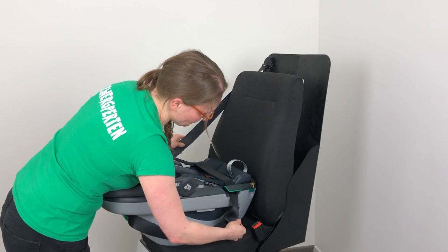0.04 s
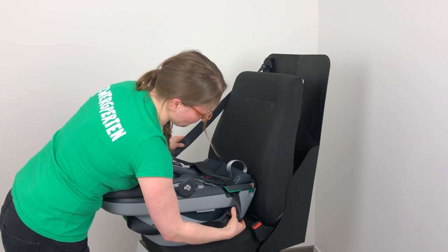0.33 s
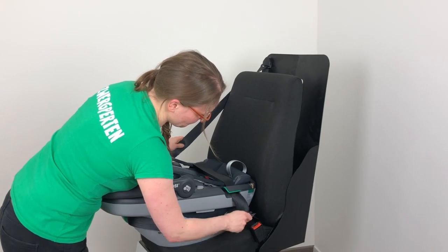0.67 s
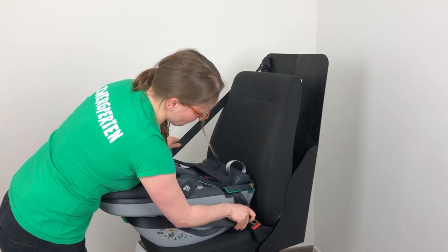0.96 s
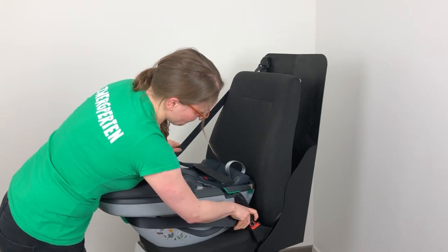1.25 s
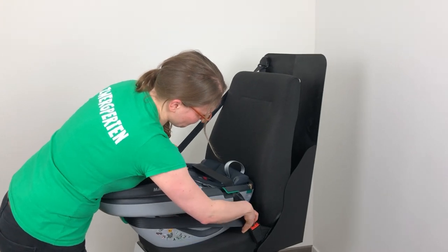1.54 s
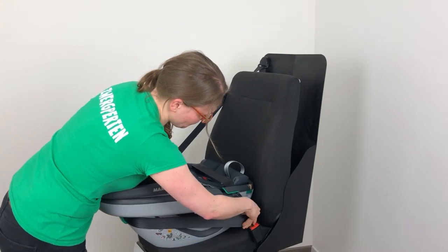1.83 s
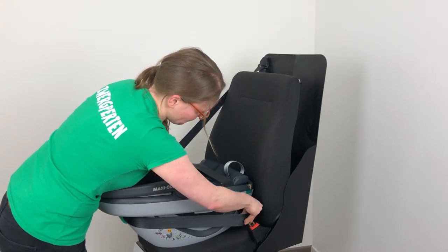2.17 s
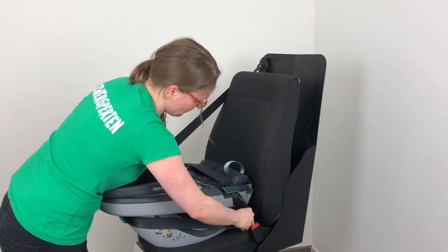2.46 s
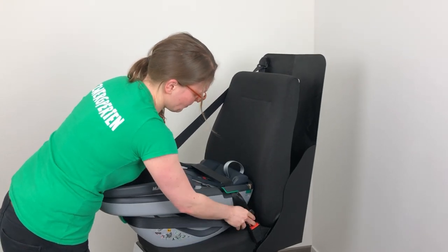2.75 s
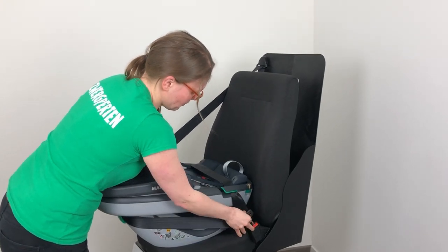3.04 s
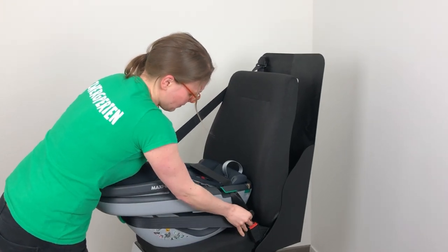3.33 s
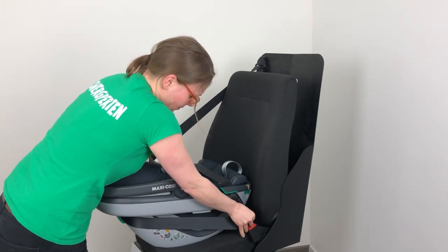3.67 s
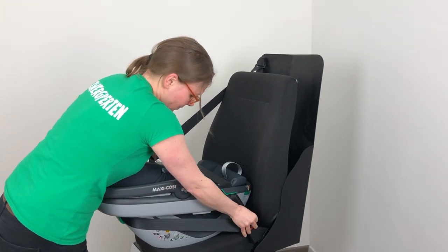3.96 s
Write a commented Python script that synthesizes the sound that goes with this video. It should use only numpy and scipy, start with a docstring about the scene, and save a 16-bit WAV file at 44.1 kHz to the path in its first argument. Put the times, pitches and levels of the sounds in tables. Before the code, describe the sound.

A seat belt buckle is handled and finally clicks home, sharp and loud. Before that come a child seat's hollow knock, a ringing clamp snap, light metal taps, low thuds and faint fabric rustle in a small bare room.

```python
"""A child seat is strapped onto a car seat in a small bare room, over a faint room tone.
First the plastic shell drops with a hollow knock, and webbing swishes as clothes rustle.
A second in, a belt clamp snaps and rings. Then the metal tongue taps and skids around the buckle
while the seat frame thuds softly under each push. Just before the end the latch springs home,
loud enough to overload the microphone."""
import sys
import numpy as np
from scipy import signal
from scipy.fft import rfft, irfft
from scipy.io import wavfile

SR = 44100
rng = np.random.default_rng(int(sys.argv[2]) if len(sys.argv) > 2 else 0)


def output_pcm(signal):
    """Save a mono or channel-first signal as 16-bit PCM at the path in sys.argv[1].

    Samples are clipped to [-1, 1] before scaling.
    """
    pcm = np.clip(np.atleast_2d(signal).T, -1, 1) * 32767
    wavfile.write(sys.argv[1], SR, np.round(pcm).astype(np.int16))


N = 176400
T = np.arange(N) / SR


def from_db(db):
    """Decibels to gain."""
    return 10 ** (np.asarray(db) / 20)


def rms_one(x):
    """Scale to rms 1."""
    return x / np.sqrt(np.mean(x ** 2) + 1e-20)


def unit_energy(x):
    """Scale to energy 1."""
    return x / np.sqrt(np.sum(x ** 2) + 1e-20)


def at_hz(curve, hz):
    """Read a curve along log frequency."""
    freqs, values = np.transpose(curve)
    return np.interp(np.log(np.maximum(hz, 1)), np.log(freqs), values)


def noise(colour):
    """Noise shaped by an EQ curve, rms 1."""
    hz = np.arange(N // 2 + 1) * SR / N
    white = rfft(rng.standard_normal(N))
    return rms_one(irfft(white * from_db(at_hz(colour, hz)) * (hz > 20), N))


def flicker(rate_hz, depth_db):
    """A randomly wavering gain."""
    return from_db(depth_db * np.interp(T * rate_hz, np.arange(4000), rng.standard_normal(4000)))


def contact(colour, size=2048):
    """One sharp click shaped by an EQ curve, energy 1."""
    hz = np.arange(size // 2 + 1) * SR / size
    cepstrum = irfft(np.log(from_db(at_hz(colour, hz))))
    cepstrum[1:size // 2] *= 2  # minimum phase packs the energy into the attack
    cepstrum[size // 2 + 1:] = 0
    return unit_energy(irfft(np.exp(rfft(cepstrum))))


def mode(hz, t60):
    """One second of a dying sine, energy 1."""
    return unit_energy(np.sin(2 * np.pi * hz * T[:SR]) * from_db(-60 * T[:SR] / t60))


def strike(cues, modes, colour, click_db, ring_db):
    """Each hit gives a contact click and sets the modes ringing in alternating polarity."""
    ring = sum(from_db(db) * (-1) ** k * mode(hz, t60) for k, (hz, db, t60) in enumerate(modes))
    hit = from_db(ring_db) * ring
    click = from_db(click_db) * contact(colour)
    hit[:len(click)] += click
    out = np.zeros(N + SR)
    for time, db in cues:
        start = int(time * SR)
        out[start:start + SR] += from_db(db) * hit
    return out[:N]


# EQ of the room tone: (frequency [Hz], gain [dB])
ROOM_TONE_EQ = [(22, -27), (35, 7), (58, 15), (75, 8), (110, -2), (280, -9), (600, -1), (1000, -9),
                (3000, -15.5), (9000, -17), (14800, -23), (16000, -19)]


def room_tone():
    """A faint, steady bed of bass-heavy noise."""
    return from_db(-50.5) * noise(ROOM_TONE_EQ)


# reverb time of the bare room: (frequency [Hz], t60 [s])
REVERB_TIMES = [(100, 1), (400, 0.54), (1000, 0.33), (2800, 0.34), (7000, 0.35), (15000, 0.21)]


def room_response(direct_db=18, early_db=5.5, early_decay_s=0.0062):
    """Direct sound, a burst of near reflections and a tail that dies band by band."""
    t, response = T[:SR], 0
    edges = np.geomspace(50, 18000, 64)
    white = rfft(rng.standard_normal(SR))
    hz = np.arange(len(white))
    early_lift = 1 + from_db(early_db) * np.exp(-t / early_decay_s)
    for low, high in zip(edges, edges[1:]):
        decay = from_db(-60 * t / at_hz(REVERB_TIMES, np.sqrt(low * high))) * early_lift
        band = irfft(white * ((hz >= low) & (hz < high)), SR) * decay
        energy = np.sum(decay ** 2) * 2 * (high - low) / SR
        response = response + unit_energy(band) * np.sqrt(energy)
    response[0] += from_db(direct_db)
    return response


# fader rides of the sleeves and of the shell on the upholstery: (time [s], relative level [dB])
SLEEVE_FADER = [(0.0, -50), (0.22, -49.5), (0.35, -54), (1.14, -51.5), (1.28, -50.5), (1.49, -47),
                (1.66, -51.5), (1.8, -55.5), (2.06, -57), (2.42, -49.5), (2.63, -53), (2.84, -53),
                (3.48, -46.5), (3.85, -50)]
UPHOLSTERY_FADER = [(0, -46), (.35, -59), (.48, -49.5), (.8, -45), (1.05, -50.5), (1.3, -37.5), (1.55, -46),
                    (1.75, -50), (1.98, -51.5), (2.05, -44), (2.24, -48.5), (2.44, -46), (2.55, -51),
                    (2.9, -51), (3.04, -47), (3.38, -51), (3.46, -40.5), (3.56, -48), (4, -40.5)]
# EQ of the bright rustle and of the low rub: (frequency [Hz], gain [dB])
SLEEVE_EQ = [(300, -16.5), (1000, 2.5), (3000, 5), (7000, -0.5), (12000, -5.5), (16000, -11)]
UPHOLSTERY_EQ = [(30, -32), (60, -22), (120, -4), (280, -1.5), (420, -6.5), (700, -11.5), (1500, -19),
                 (4000, -41)]


def cloth():
    """Sleeves rustle and the shell rubs on the upholstery."""
    grain, sway = flicker(120, depth_db=1.5), flicker(60, depth_db=.8)
    rustle = from_db(np.interp(T, *np.transpose(SLEEVE_FADER))) * noise(SLEEVE_EQ)
    rub = from_db(np.interp(T, *np.transpose(UPHOLSTERY_FADER)) + 3.5) * noise(UPHOLSTERY_EQ)
    return rustle * grain + rub * sway


# belt swishes: (peak time [s], half length [s], relative level [dB], band centre [Hz])
SWISHES = [(0.101, 0.022, -53, 9000), (0.37, 0.044, -53.5, 5940), (0.592, 0.027, -45, 2100),
           (0.678, 0.032, -45, 2420), (0.687, 0.025, -47, 7000), (0.799, 0.024, -46, 2340),
           (0.901, 0.031, -48, 1390), (2.072, 0.036, -46.5, 930), (2.338, 0.014, -46, 880),
           (2.864, .025, -52, 2040), (3.043, 0.054, -49, 890), (3.412, 0.0099, -35.5, 2510),
           (3.765, 0.019, -48.5, 1490)]


def webbing(edge_ratio=1.38):
    """The belt slides in short, grainy swells of band-passed hiss."""
    out = 0
    for time, half_length, db, hz in SWISHES:
        band = signal.butter(1, [hz / edge_ratio, hz * edge_ratio], "band", fs=SR, output="sos")
        hiss = rms_one(signal.sosfilt(band, rng.standard_normal(N)))
        swell = np.exp(-.5 * ((T - time) / half_length) ** 2)
        out = out + from_db(db + 2.5) * hiss * swell
    return out * flicker(300, depth_db=3)


# pushes on the seat frame: (time [s], relative level [dB], rise [s], decay [s])
PUSHES = [(1.22, -40.5, 0.034, 0.18), (1.39, -29.5, .025, 0.076), (1.69, -45, 0.011, 0.19),
          (2.19, -50.5, 0.025, 0.15), (3.0, -46, .03, 0.12), (3.432, -33.5, 0.017, 0.066),
          (3.769, -35, 0.025, 0.047), (3.885, -26, 0.016, .15)]
# EQ of the frame's rumble: (frequency [Hz], gain [dB])
RUMBLE_EQ = [(25, -40), (42, -14), (60, 23), (85, -29), (130, 0), (220, -38), (500, -63)]


def frame_thuds(mode_hz=60.7):
    """The seat frame gives under a push and booms at its lowest mode, with a dull rumble around it."""
    envelope = 0
    for time, db, rise, decay in PUSHES:
        attack = np.clip((T - time) / rise, 0, 1)
        release = np.exp(-np.maximum(T - time - rise, 0) / decay)
        envelope = envelope + from_db(db) * attack * release
    wavering_hz = mode_hz * flicker(24.76, depth_db=1.6)
    boom = np.sin(2 * np.pi * np.cumsum(wavering_hz) / SR)
    return envelope * (from_db(4) * boom + from_db(-17) * noise(RUMBLE_EQ))


# the padded shell meets the seat, then from 3.43 s the buckle thumps low: (time [s], relative level [dB], pitch
# [Hz])
SOFT_BUMPS = [(0.27, -33, 330), (0.288, -33, 303), (1.17, -40, 170), (1.234, -55, 165), (3.428, -29.5, 246),
              (3.449, -31, 198), (3.49, -34, 140)]


def padded_bumps(rise_s=0.002, decay_s=.018):
    """Each soft contact is a low note that swells and is damped at once."""
    out = 0
    for time, db, hz in SOFT_BUMPS:
        age = np.maximum(T - time, 0)
        envelope = (1 - np.exp(-age / rise_s)) * np.exp(-age / decay_s)
        out = out + from_db(db + 5) * np.sin(2 * np.pi * hz * age) * envelope
    return out


def chatter(touches_per_s=2500, decay_s=.006, run_db=1, size=2048):
    """The loose tongue skids: a first contact, then a dying run of tiny ones, energy 1."""
    touches = (rng.random(size) < touches_per_s / SR) * rng.standard_normal(size)
    run = from_db(run_db) * unit_energy(touches * np.exp(-T[:size] / decay_s))
    run[0] += 1  # the first contact
    return unit_energy(run)


# the tongue is pushed against the buckle housing: (time [s], relative level [dB])
TONGUE_TAPS = [(1.3712, -38), (1.5827, -42.5), (1.6191, -47), (2.0292, -48), (2.322, -51), (3.4035, -26.5),
               (3.407, -38), (3.4145, -25.5), (3.440, -39), (3.863, -38.5)]
# light clinks of the loose tongue: (time [s], relative level [dB], pitch [Hz])
TONGUE_CLINKS = [(0.519, -50, 3300), (1.077, -51, 3770), (2.21, -44.5, 3930), (2.253, -50.5, 3030),
                 (3.2538, -42, 3930)]
# its metallic ring: (frequency [Hz], relative level [dB], t60 [s])
TONGUE_RING = [(1265, -8, 0.024), (1590, -8, 0.06), (2185, -20, 0.022), (3270, -14, 0.045),
               (4040, -30.5, 0.011), (4880, -15, 0.024)]
# EQ of its click: (frequency [Hz], gain [dB])
TONGUE_EQ = [(60, -21), (150, 2), (400, -8), (1000, 9), (2500, 5), (5000, -2.5), (8000, -12.5),
             (12000, -18.5), (16000, -46)]


def tongue_taps(clink_t60_s=.013):
    """The metal tongue taps and clinks around the buckle, each touch roughened by a skid."""
    hits = strike(TONGUE_TAPS, TONGUE_RING, TONGUE_EQ, click_db=-2.5, ring_db=-4.5)
    for time, db, hz in TONGUE_CLINKS:
        hits += strike([(time, db)], [(hz, 0, clink_t60_s)], TONGUE_EQ, click_db=-2.5, ring_db=-6.5)
    return signal.fftconvolve(hits, chatter())[:N]


# the shell lands and settles: (time [s], relative level [dB])
SHELL_HITS = [(0.2308, -22.5), (0.236, -38), (0.249, -44)]
# its hollow body: (frequency [Hz], relative level [dB], t60 [s])
SHELL_RING = [(341, -6.5, 0.043), (410, -23, 0.032), (676, -9, 0.02), (820, -3.5, 0.015),
              (1530, -13, 0.012), (2510, -10.5, 0.019)]
# EQ of its attack: (frequency [Hz], gain [dB])
SHELL_EQ = [(60, -15), (150, -5), (300, 11), (800, -3), (1800, -4.5), (2700, -4), (4000, -16), (8000, -30),
            (16000, -50)]


def shell_knock():
    """The plastic shell drops with a knock whose modes die quickly."""
    return strike(SHELL_HITS, SHELL_RING, SHELL_EQ, click_db=-4.5, ring_db=-5)


# the clamp's snap, a rebound and the jolt it gives the shell: (time [s], relative level [dB])
CLAMP_HITS = [(1.1112, -9.5), (1.1135, -10.5), (1.122, -16.5)]
# its ring: (frequency [Hz], relative level [dB], t60 [s])
CLAMP_RING = [(239, -13, 0.31), (406, -16.5, 0.47), (669, 3.5, 0.2), (748, -15.5, 0.043),
              (1232, -5.5, 0.031), (1480, -12.5, 0.0064), (1520, -9, 0.11), (3560, -25, 0.014),
              (4300, -22.5, 0.0065), (6960, -16, 0.0088)]
# EQ of its crack: (frequency [Hz], gain [dB])
CLAMP_EQ = [(60, -38.5), (130, 2), (230, 13), (470, -8.5), (750, 0.5), (1300, 13), (2600, -3), (4300, 0.5),
            (6000, -8.5), (10000, -13), (16000, -18)]


def clamp_snap():
    """The belt clamp snaps and rebounds, jolting the shell, and its low modes ring on."""
    return strike(CLAMP_HITS, CLAMP_RING, CLAMP_EQ, click_db=-4.5, ring_db=-6)


# the latch catches and the tongue settles: (time [s], relative level [dB])
LATCH_HITS = [(3.884, -1), (3.8905, -20.5), (3.907, -16)]
# the buckle's ring: (frequency [Hz], relative level [dB], t60 [s])
BUCKLE_RING = [(904, -9, 0.11), (990, -7, 0.073), (1189, 0, 0.056), (1193, -6, 0.091), (1257, -1.5, 0.079),
               (1328, -1.5, 0.025), (2880, -31, 0.064), (3640, -39, 0.04), (5130, -10, 0.021),
               (5090, -32, 0.043), (7140, -12.5, 0.031), (8420, -32, 0.12)]
# EQ of its crack: (frequency [Hz], gain [dB])
BUCKLE_EQ = [(60, -24), (150, -16.5), (500, -12.5), (800, -4.5), (1200, 8), (2000, -5), (3200, 1),
             (6500, -5), (10000, -9.5), (16000, -18)]


def buckle_latch():
    """The latch springs home with a hard, bright crack that rings the buckle."""
    return strike(LATCH_HITS, BUCKLE_RING, BUCKLE_EQ, click_db=-1, ring_db=-4.5)


def scene():
    """Mono mix: the hard hits excite the room, the soft layers stay dry."""
    knock = shell_knock()
    hits = tongue_taps() + knock + clamp_snap() + buckle_latch()
    hits = signal.fftconvolve(hits, room_response())[:N]
    hits += from_db(21) * knock  # the shell faces the microphone, so more of it arrives directly
    return (hits + padded_bumps() + frame_thuds() + webbing() + cloth() + room_tone())[None]


def record(dry):
    """The input clips hard at full scale; the deep bass and the top are cut."""
    bass_cut = signal.butter(2, 36, "high", fs=SR, output="sos")
    top_cut = signal.ellip(10, .1, 70, 16000, fs=SR, output="sos")
    clipped = np.clip(dry, -1, 1)
    return signal.sosfilt(top_cut, signal.sosfilt(bass_cut, clipped))


dry = scene()
out = record(dry)
output_pcm(out)
```